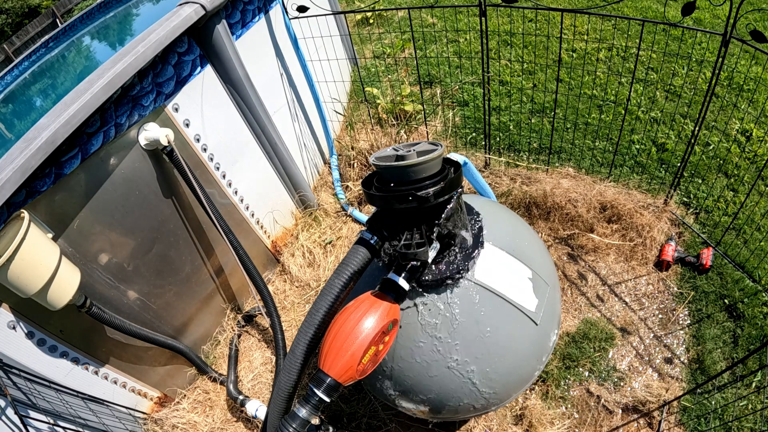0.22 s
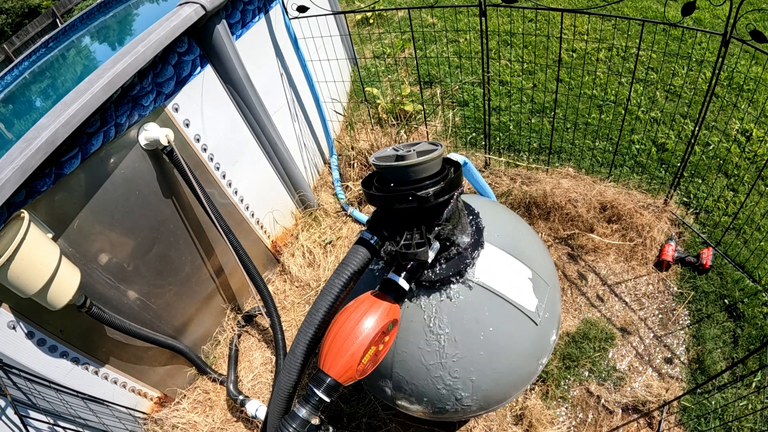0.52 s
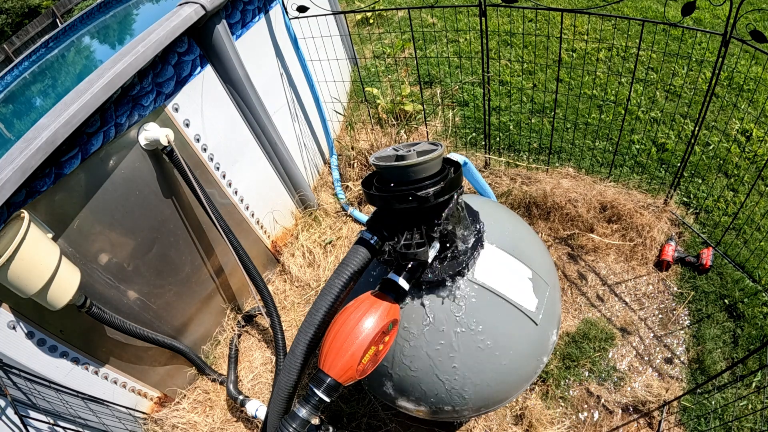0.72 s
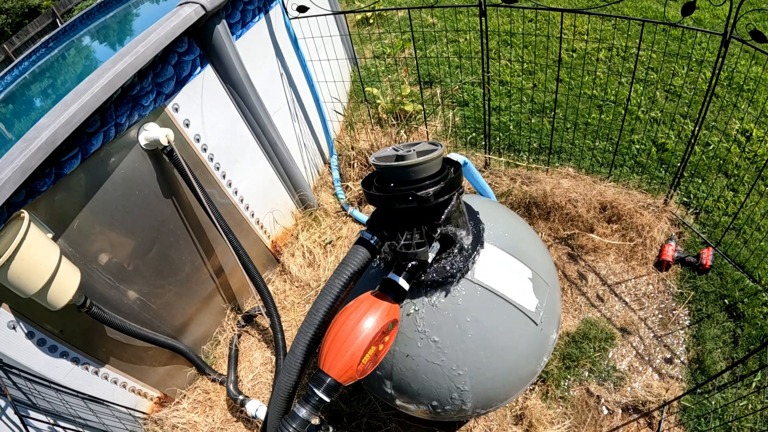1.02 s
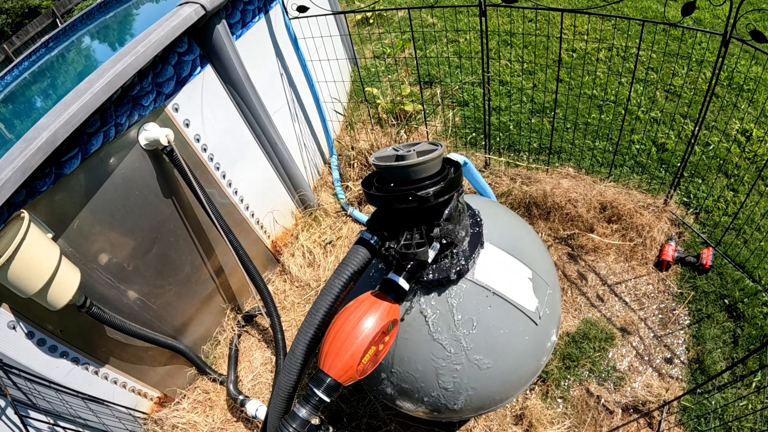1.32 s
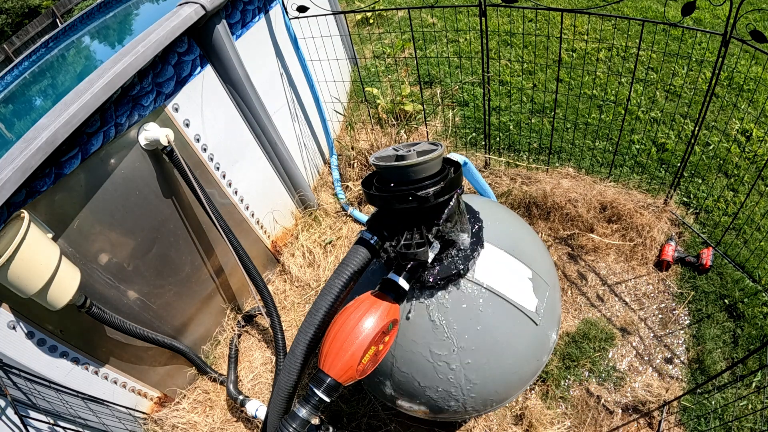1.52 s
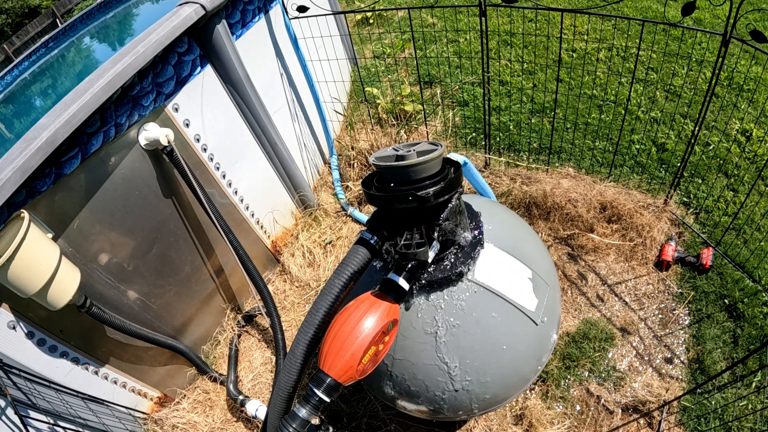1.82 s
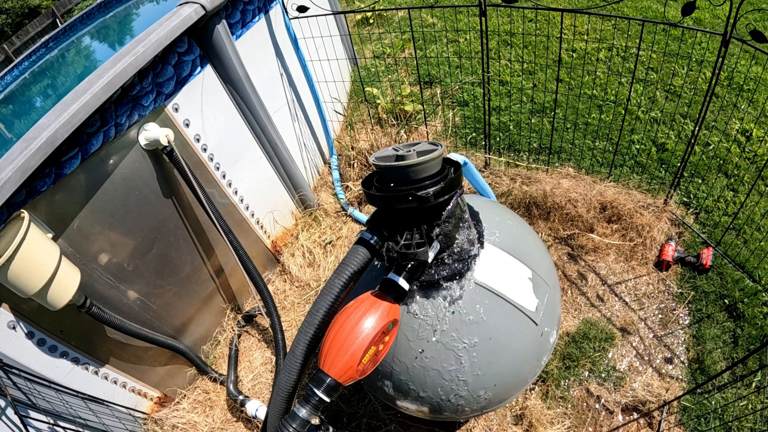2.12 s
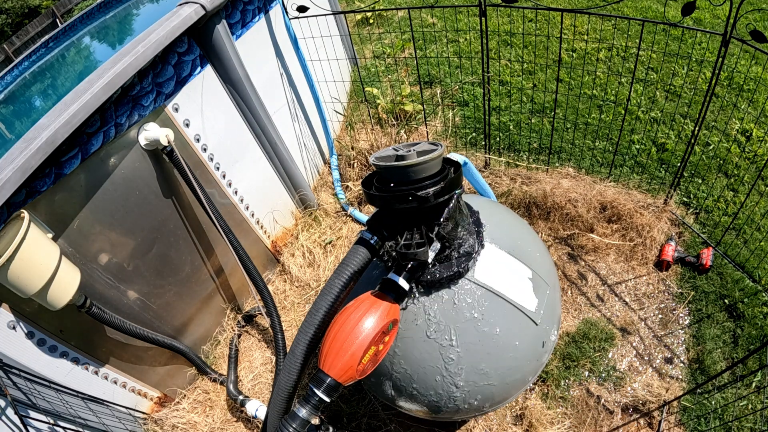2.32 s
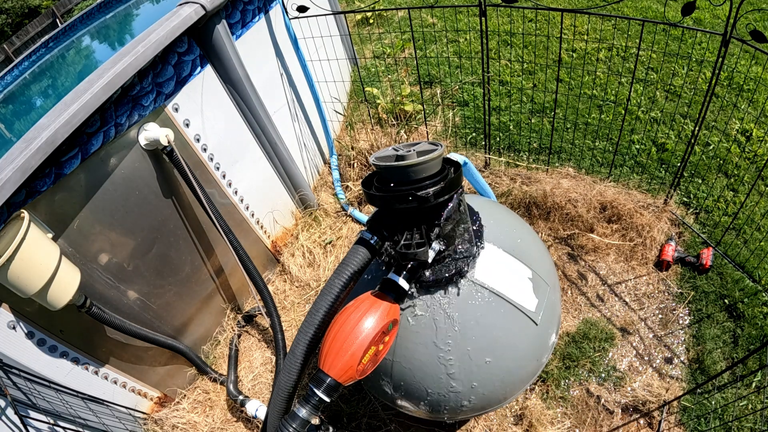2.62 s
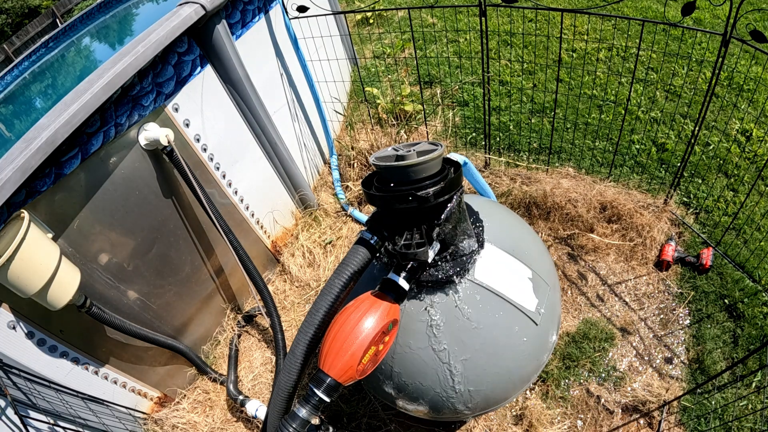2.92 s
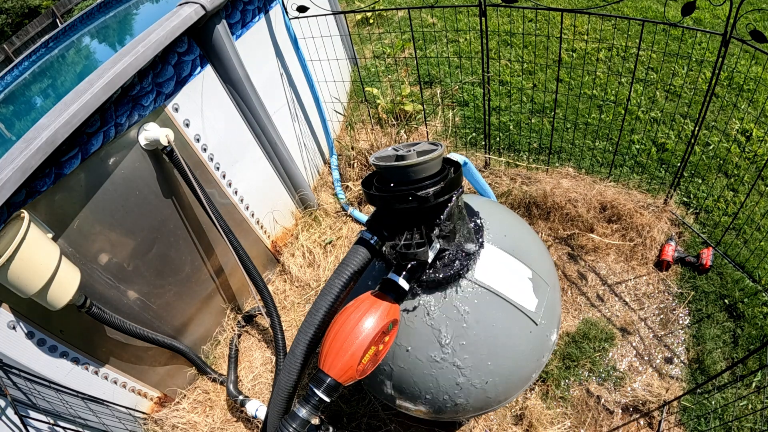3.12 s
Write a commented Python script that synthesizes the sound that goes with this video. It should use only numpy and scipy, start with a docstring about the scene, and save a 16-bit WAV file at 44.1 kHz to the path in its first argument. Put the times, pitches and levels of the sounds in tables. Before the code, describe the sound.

Water gurgles and trickles from an open pool filter valve down the tank, with wind bumps

```python
"""Water gurgles and trickles at once, welling from an open pool filter valve and down the tank, outdoors.
Many small ringing bubbles, rising in pitch, make the gurgle and patter; shaped noise makes the wash.
Single plips, bright ticks on the plastic and clusters of small bubbles stand out of the trickle.
Two gusts of low noise buffet the microphone with soft bumps, more on the right.
Four tiny squeaks, one very faint, are chirps of a few harmonics within the first gust."""
import sys
import numpy as np
from scipy import signal
from scipy.fft import rfft, irfft
from scipy.io import wavfile

SR = 44100
rng = np.random.default_rng(int(sys.argv[2]) if len(sys.argv) > 2 else 0)


def generate_wav(signal):
    """Clip the signal to [-1, 1] and save it as 16-bit WAV at the path in sys.argv[1]."""
    frames = np.transpose(np.atleast_2d(signal))
    scaled = np.clip(frames, -1, 1) * 32767
    pcm = np.round(scaled).astype(np.int16)
    wavfile.write(sys.argv[1], SR, pcm)


N = 143325

# rise and fall of the water; only its changes are used,
# softened for gurgle and wash, strengthened for patter:
# [t/s, gurgle level/dB, spray level/dB]
FLOW = [(0, -37.5, -47), (.2, -40, -48), (.26, -43.5, -45.5), (.35, -41.5, -53), (.56, -40, -46.5),
        (.8, -42, -45.5), (1.12, -37, -48), (1.3, -44, -46.5), (1.62, -45, -46.5), (1.69, -45.5, -44),
        (1.8, -39, -45.5), (2.0, -39, -46.5), (2.1, -41.5, -46), (2.45, -43, -46.5), (2.62, -44, -49),
        (2.8, -42, -43.5), (3.07, -41, -49.5), (3.25, -52, -43.5)]
# tone of the larger bubbles, the fine drops and the smooth wash: [f/Hz, level/dB]
GURGLE_TONE = [(400, -3), (700, -9), (1000, -1), (1400, -1), (2000, -2.5), (2800, -2.5), (4000, -5),
               (6500, -9), (8500, -10.5)]
PATTER_TONE = [(500, -14), (1200, -1.5), (3000, 3), (4800, -3.5), (6500, -3), (8600, -13), (10300, -8.5),
               (12500, -17), (14500, -25.5), (16000, -31)]
WASH_TONE = [(59, -30), (100, 0), (134, 5.5), (173, -15), (276, -18), (670, -13.5), (1020, -4),
             (1530, -0.5), (2880, 1), (3490, -5.5), (6440, -8.5), (8660, -17), (10300, -14), (13800, -28),
             (15600, -53)]
# the hollow low gurgle: its strength [t/s, level/dB] and its tone [f/Hz, level/dB]
HOLLOW_LEVEL = [(0, -59), (.28, -73), (.32, -57.5), (.42, -70), (.49, -60), (.54, -43.5), (.7, -55.5),
                (.85, -51.5), (1.0, -65), (2.12, -64.5), (2.19, -47), (2.3, -60.5), (2.64, -64),
                (2.78, -49.5), (2.92, -55.5), (3.25, -60)]
HOLLOW_TONE = [(150, 22), (300, -0.5), (480, 2.5), (620, -2), (850, 0.5), (1300, -4)]
# tone of the wide hiss that differs between left and right, on top of the wash: [f/Hz, level/dB]
WIDE_TONE = [(200, -12), (600, -5.5), (2000, -16.5), (6000, -17.5), (8500, -1), (10300, -17.5),
             (13000, 1.5)]
# strength of the wind: [t/s, rumble level/dB, flutter level/dB], both before their trims
GUSTS = [(0, -53.5, -55), (.22, -50.5, -60), (.27, -41.5, -51.5), (.37, -47.5, -61), (.46, -27, -74),
         (.53, -29.5, -47), (.6, -35.5, -44), (.67, -32, -31.5), (.71, -42, -46), (.79, -19.5, -47),
         (.83, -26.5, -36.5), (.88, -32, -64), (.94, -22.5, -40), (1.0, -25.5, -45), (1.04, -38, -64),
         (1.16, -36, -49), (1.33, -44.5, -67), (1.42, -39, -68), (1.55, -41.5, -72), (1.62, -45.5, -70),
         (1.8, -44, -63), (1.92, -34.5, -59), (2.0, -29, -52), (2.09, -30.5, -46), (2.12, -32, -50),
         (2.19, -35, -37.5), (2.41, -31.5, -44.5), (2.47, -35, -45), (2.65, -37.5, -60), (2.72, -44.5, -62),
         (2.82, -50.5, -61), (2.95, -47.5, -57.5), (3.25, -48.5, -67)]
# tone of the wind's low rumble and of the flutter above it: [f/Hz, level/dB]
RUMBLE_TONE = [(8, -1), (22, 2.5), (40, 2), (70, -4), (110, -13.5), (170, -33.5), (300, -34), (600, -90)]
FLUTTER_TONE = [(50, -42), (110, -5.5), (150, -0.5), (220, -7), (320, -13), (450, -28), (800, -26),
                (2000, -83)]
# low bumps of the gusts, before panning: [t/s, peak level/dB, half length/s]
BUMPS = [(0.608, -23, 0.0019), (0.645, -20, 0.0042), (.664, -21.5, 0.00092), (0.677, -20, 0.0019),
         (0.74, -25, .0015), (0.754, -20, 0.0029), (0.803, -18.5, 0.00034), (.829, -15, 0.0018),
         (.931, -20, 0.0018), (0.997, -16.5, 0.0046), (1.994, -21.5, 0.005), (2.087, -17.5, 0.0024),
         (2.191, -20, .001), (2.239, -23, 0.0019), (2.293, -18, 0.00197), (2.335, -24, 0.0014),
         (2.365, -19, 0.0023), (2.39, -21.5, 0.0014), (2.414, -17, 0.0021)]
# the clearest bubbles and drops: [t/s, peak level/dB before the trim, starting f/Hz, ring time constant/s]
PLIPS = [(0.0366, -29, 1950, 0.0027), (0.0852, -23.5, 3700, 0.00082), (0.0928, -31, 3570, 0.0019),
         (0.1056, -18, 2620.0, 0.00042), (0.1503, -26.5, 3230, 0.0035), (0.1956, -28, 1500, 0.0033),
         (0.1968, -29, 2480, 0.0021), (0.2205, -26.5, 1310, 0.0013), (0.2355, -23, 3560, 0.0006),
         (0.2448, -23, 5260.0, 0.0005), (0.2448, -19.5, 3570, 0.00079), (0.2521, -29, 2840.0, 0.0032),
         (0.2571, -25.0, 5480.0, 0.00046), (0.4492, -29, 3870, 0.0036), (0.4547, -24.5, 2500, 0.0031),
         (0.5778, -27.0, 3490.0, 0.0017), (0.6715, -25, 3070, 0.0006), (0.6762, -25, 2620.0, 0.0014),
         (0.7786, -17.5, 2970, 0.0011), (0.783, -26, 2800, 0.00064), (0.9326, -24, 2600, 0.0028),
         (0.9651, -21, 2040, 0.00049), (1.0963, -25.5, 4350, 0.0013), (1.1172, -24, 4460, 0.0018),
         (1.1266, -23, 2530, 0.00047), (1.3654, -29.5, 2170, 0.0033), (1.3946, -27.0, 2580, 0.001),
         (1.4167, -21.5, 2410, 0.0027), (1.5508, -22.5, 2140, 0.0029), (1.6586, -34, 2750, 0.0033),
         (1.6686, -23.5, 2840.0, 0.0015), (1.68, -21, 2480, 0.0011), (1.6801, -29, 4500, 0.002),
         (1.6805, -21.5, 1730, 0.0023), (1.7074, -24.5, 4280.0, 0.00075), (1.7545, -26, 2510.0, 0.0012),
         (1.7861, -22.5, 2280, 0.001), (1.8534, -28.0, 2280, 0.0012), (1.8648, -29.0, 2340, 0.0007),
         (1.8707, -29, 1990, 0.0024), (1.9906, -22, 2240, 0.0007), (1.9928, -24.5, 7130, 0.001),
         (2.118, -25.5, 2680, 0.0027), (2.2288, -27, 2130.0, 0.0014), (2.3824, -25.5, 4460.0, 0.0006),
         (2.4164, -11, 5600, 0.00046), (2.4167, -17, 2860, 0.0015), (2.53, -26.5, 2040, 0.0025),
         (2.7359, -19, 5480.0, 0.00091), (2.7533, -29.5, 1430, 0.0024), (2.7534, -20.5, 2760, 0.0023),
         (2.7901, -28, 2300, 0.0022), (2.8037, -32.0, 2070, 0.004), (2.8156, -34, 1480.0, 0.0017),
         (2.9152, -24.5, 3000, 0.0014), (2.9585, -30.5, 2550, 0.002), (3.0935, -29.5, 1590, 0.0027)]
# larger, slower bubbles: [t/s, peak level/dB, starting f/Hz, ring time constant/s]
GULPS = [(.312, -41, 680, 0.014), (.496, -34.5, 1317, 0.0046), (1.045, -33, 1680, 0.0027),
         (1.244, -45, 1240, 0.0025), (1.428, -32.5, 1135, .004), (1.581, -34, 1190, 0.0045),
         (2.899, -36, 732, 0.0092), (2.913, -41, 940, .004), (2.928, -42, 870, .004),
         (3.181, -34, 1520, .005), (3.226, -30, 1480, 0.0041)]
# bright ticks of spray on the tank: [t/s, peak level/dB]
TICKS = [(0.0806, -33), (.278, -26), (.445, -28.5), (0.561, -27), (.666, -34), (.816, -40), (.9505, -48),
         (1.668, -27.5), (1.748, -32), (2.3166, -29), (2.416, -27), (2.736, -31.5), (2.837, -33.5),
         (3.133, -30), (3.209, -34.5)]
# dense bursts of droplets: [t/s, level/dB, length/s, centre f/Hz]
SPLASHES = [(0.081, -43, .03, 3540), (0.217, -42.5, 0.011, 1480), (0.24, -39, .02, 4140),
            (1.66, -39.5, 0.026, 3050), (1.705, -54, 0.015, 4400), (1.984, -43, 0.034, 2460),
            (2.227, -40.5, .016, 2310), (2.751, -42, .02, 2420), (2.786, -42, 0.046, 2080),
            (2.951, -39.5, 0.024, 2930), (2.988, -39.5, 0.021, 4200)]
# short squeaks: [t/s, length/s, level/dB, top f/Hz before jitter, place of the top from 0 to 1]
SQUEAKS = [(0.5, 0.046, -27.5, 964, 0.39), (0.538, 0.022, -40, 950, 0), (0.58, 0.026, -27, 902, 0.58),
           (0.683, 0.0212, -17.5, 895, 0.74)]
# strength of each squeak's harmonics, lowest first: [level/dB]
SQUEAK_HARMONICS = [-4.5, -8, -17, -20.5]
# the water's place, left minus right: [f/Hz, level/dB]
BALANCE = [(200, 5.5), (500, 1), (1200, -0.5), (2400, -1), (4400, 0.5), (8000, 0.5), (13000, 4)]
# tone of the reflections off tank and pool wall: [f/Hz, level/dB]
SCATTER_TONE = [(300, -7), (1500, -22), (4000, -4), (8000, -8), (12000, -5.5)]
# how far the left side lags: [f/Hz, phase/radians]
LEFT_LAG = [(300, 0.083), (1000, 0.3), (1700, 0.54), (4100, 0.31), (8000, 0.058), (10000, 0.052),
            (15000, .15)]

GURGLE_DB, BUBBLES_PER_S, BUBBLE_SPREAD_DB, BUBBLE_CYCLES = -43.5, 1300, 3.5, 4.27
PATTER_DB, DROPS_PER_S, DROP_SPREAD_DB, DROP_CYCLES = -47, 2000, 3.5, 3
WASH_DB, SURGE_DB, SURGE_HZ = -45.5, 2.5, 36.4
WIND_PAN_DB, WIND_APART_DB = -5.5, -15  # left minus right; part that differs between the sides
RUMBLE_TRIM_DB, FLUTTER_TRIM_DB = 0.5, -2.5
PUFF_DB, PUFF_HZ = 3.5, 30  # the flutter comes in uneven puffs
GLIDE, GULP_GLIDE = 0.06, 0.076  # share by which pitch rises in one ring time constant
GLIDE_LIMIT, ONSET_CYCLES = 3.8, 1.0  # the rise stops after this many time constants
PLIP_TRIM_DB = -1
TICK_HZ, TICK_WIDTH_HZ, TICK_S = 8800, 2400, 0.00027
SPLASH_SPREAD, SPLASH_CYCLES = 0.401, 2.3  # scatter of pitch (log units), ring of each droplet
SQUEAK_ARCH, SQUEAK_JITTER, SQUEAK_SHARP = 0.21, 0.033, 1.75  # pitch shares; power of the fade shape
SQUEAK_ECHO_DB, SQUEAK_ECHO_S = -10, 0.016
SCATTER_S = 0.006  # time constant of the reflections
EDGE_HZ = 15700


def amp(db):
    """Turns decibels into a gain."""
    return 10 ** (np.asarray(db) / 20)


def unit(x):
    """Scales a sound to an average (rms) strength of 1."""
    return x / np.sqrt(np.mean(x ** 2) + 1e-20)


def add(mix, s, sound):
    """Mixes a sound in, starting at s seconds."""
    part = mix[max(round(s * SR), 0):][:len(sound)]
    part += sound[:len(part)]


def colour(x, points, share=1):
    """Changes the tone along a curve of (f/Hz, level/dB), or by a share of it."""
    hz, db = np.transpose(points)
    f = np.fft.rfftfreq(2 * N, 1 / SR)
    gain = amp(share * np.interp(np.log(f + 1), np.log(hz), db))
    return irfft(rfft(x, 2 * N) * gain)[..., :N]


def curve(table, axis):
    """Draws one column of a timed table as a line through every sample."""
    rows = np.array(table)
    return np.interp(np.arange(N) / SR, rows[:, 0], rows[:, axis])


def wander(hz):
    """Makes a random drift, weak below 2 Hz and above the given rate, of rms 1."""
    f = np.fft.rfftfreq(N, 1 / SR)
    keep = f / (f + 2) / np.sqrt(1 + (f / hz) ** 4)
    return unit(irfft(rfft(rng.standard_normal(N)) * keep, N))


def bubble(hz, ring_s, glide=GLIDE):
    """A bubble swells within a cycle or two, then dies away as its pitch rises."""
    t = np.arange(int(8 * ring_s * SR) + 16) / SR
    shape = (1 - np.exp(-t * hz / ONSET_CYCLES)) * np.exp(-t / ring_s)
    pitch = hz * (1 + glide * np.minimum(t / ring_s, GLIDE_LIMIT))
    return shape / shape.max() * np.sin(2 * np.pi * np.cumsum(pitch) / SR)


def swarm(low_hz, high_hz, per_s, spread_db, cycles, count):
    """Bubbles of every size ring at random moments, a few much stronger than the rest."""
    out = np.zeros(N)
    for live, when, pitch, size, damping, sign in rng.random((count, 6)):
        if live < per_s * N / SR / count:  # keeps about per_s bubbles a second
            hz = low_hz * (min(high_hz, SR / 3) / low_hz) ** pitch
            ring_s = cycles * 2 ** (2 * damping - 1) / hz  # half to twice the usual ring
            ring = bubble(hz, ring_s)
            gain = amp(spread_db * min(-np.log(size), 3.5)) * np.sign(sign - .5)
            add(out, when * N / SR, gain * ring * np.sqrt(hz / (ring @ ring)))
    return out


def trickle():
    """Bubbles gurgle and patter over a noise wash; all but the hollow gurgle surge with the flow."""
    low, high = curve(FLOW, axis=1), curve(FLOW, axis=2)
    low, high = low - low.mean(), high - high.mean()
    surge = SURGE_DB * wander(SURGE_HZ)
    bubbles = swarm(996, 7210, BUBBLES_PER_S, BUBBLE_SPREAD_DB, BUBBLE_CYCLES, count=6500)
    fine_drops = swarm(1252, 13570, DROPS_PER_S, DROP_SPREAD_DB, DROP_CYCLES, count=9000)
    big_bubbles = swarm(257.4, 1146, per_s=350, spread_db=2.6, cycles=3.45, count=1600)
    gurgle = colour(bubbles, GURGLE_TONE) * amp(0.65 * low + surge)
    patter = colour(fine_drops, PATTER_TONE) * amp(1.24 * high + 1.13 * surge)
    hollow = colour(big_bubbles, HOLLOW_TONE)
    wash = colour(rng.standard_normal(N), WASH_TONE) * amp(0.67 * high + 0.34 * surge)
    return (amp(GURGLE_DB) * unit(gurgle)
            + amp(PATTER_DB) * unit(patter)
            + amp(curve(HOLLOW_LEVEL, axis=1)) * unit(hollow)
            + amp(WASH_DB) * unit(wash))


def spray():
    """Fine hiss from all around the tank: noise with opposite signs left and right sounds wide."""
    wash = unit(colour(rng.standard_normal(N), WASH_TONE))
    hiss = colour(wash, WIDE_TONE)
    return amp(WASH_DB) * np.array([hiss, -hiss])


def air():
    """Moving air makes a low rumble, with a puffing flutter above it, from two bands of noise."""
    rumble = unit(colour(rng.standard_normal(N), RUMBLE_TONE))
    flutter = unit(colour(rng.standard_normal(N), FLUTTER_TONE))
    flutter_db = FLUTTER_TRIM_DB + curve(GUSTS, axis=2) + PUFF_DB * wander(PUFF_HZ)
    return rumble * amp(RUMBLE_TRIM_DB + curve(GUSTS, axis=1)) + flutter * amp(flutter_db)


def wind():
    """Gusts rumble, flutter and bump on the microphone, more on the right."""
    both = air()
    apart = amp(WIND_APART_DB) * colour(air(), [(50, -5), (130, -1), (300, 8)])
    for s, db, half_s in BUMPS:
        u = (np.arange(N) / SR - s) / half_s
        both += amp(db) * u * np.exp((1 - u ** 2) / 2)  # one dip, then one push
    left = (both + apart) * amp(WIND_PAN_DB / 2)
    right = (both - apart) * amp(-WIND_PAN_DB / 2)
    return np.array([left, right])


def drops():
    """Single bubbles plip and gulp, and tiny bursts of bright noise tick on the plastic."""
    out = np.zeros(N)
    for s, db, hz, ring_s in PLIPS:
        add(out, s, amp(db + PLIP_TRIM_DB) * bubble(hz, ring_s))
    for s, db, hz, ring_s in GULPS:
        add(out, s, amp(db) * bubble(hz, ring_s, GULP_GLIDE))
    t = np.arange(256) / SR
    f = np.fft.rfftfreq(len(t), 1 / SR)
    band = np.exp(-((f - TICK_HZ) / TICK_WIDTH_HZ) ** 2 / 2)
    shape = (t / TICK_S) ** 2 * np.exp(-t / TICK_S)
    for s, db in TICKS:
        tick = irfft(rfft(rng.standard_normal(len(t)) * shape) * band)
        add(out, s, amp(db) * tick / abs(tick).max())
    return out


def splashes(count=60):
    """Water breaks on the tank in short clusters of small bubbles."""
    out = np.zeros(N)
    for s, db, length, centre_hz in SPLASHES:
        burst = np.zeros(SR // 4)
        for when, pitch in zip(rng.random(count), rng.standard_normal(count)):
            hz = min(centre_hz * np.exp(SPLASH_SPREAD * pitch), SR / 3)
            add(burst, when * length, bubble(hz, SPLASH_CYCLES / hz))
        add(out, s, amp(db) * burst * np.sqrt(length * SR / (burst @ burst)))
    return out


def squeaks():
    """Brief chirps of a few harmonics, each with a small arch in pitch and a short echo."""
    out, jitter = np.zeros(N), wander(200)
    for s, length, db, hz, top in SQUEAKS:
        u = np.arange(0, length, 1 / SR) / length  # 0 to 1 through the squeak
        wobble = SQUEAK_JITTER * jitter[int(s * SR):][:len(u)]
        pitch = hz * (1 - SQUEAK_ARCH * (u - top) ** 2 + wobble)
        turn = 2 * np.pi * np.cumsum(pitch) / SR
        tone = sum(amp(level) * np.sin((k + 1) * turn) for k, level in enumerate(SQUEAK_HARMONICS))
        add(out, s, amp(db) * abs(np.sin(np.pi * u)) ** SQUEAK_SHARP * tone)
    t = np.arange(4096) / SR
    echo = rng.standard_normal(len(t)) * np.exp(-t / SQUEAK_ECHO_S)
    echo /= np.linalg.norm(echo)
    return out + amp(SQUEAK_ECHO_DB) * signal.fftconvolve(out, echo)[:N]


def yard(x):
    """Direct sound, a little later on the left, with short scatter from tank and pool wall."""
    t = np.arange(4096) / SR
    tails = rng.standard_normal((2, len(t))) * np.exp(-t / SCATTER_S) * (t > .001)
    tails /= np.linalg.norm(tails, axis=1, keepdims=True)
    scatter = colour(signal.fftconvolve(x[None], tails, axes=1)[:, :N], SCATTER_TONE)
    lag = np.interp(np.fft.rfftfreq(N, 1 / SR), *np.transpose(LEFT_LAG))
    late = irfft(rfft(x) * np.exp(-1j * lag), N)
    left = colour(late + scatter[0], BALANCE, .5)
    right = colour(x + scatter[1], BALANCE, -.5)
    return np.array([left, right])


def scene():
    """Water and squeaks in the yard, spray all around, wind at the microphone."""
    return yard(trickle() + drops() + splashes() + squeaks()) + spray() + wind()


def record(dry):
    """The recorder's band limit: a filter takes away what lies above EDGE_HZ."""
    low_pass = signal.firwin(511, EDGE_HZ, window=("kaiser", 9), fs=SR)
    return signal.oaconvolve(dry, low_pass[None], "same")


dry = scene()
out = record(dry)
generate_wav(out)
```